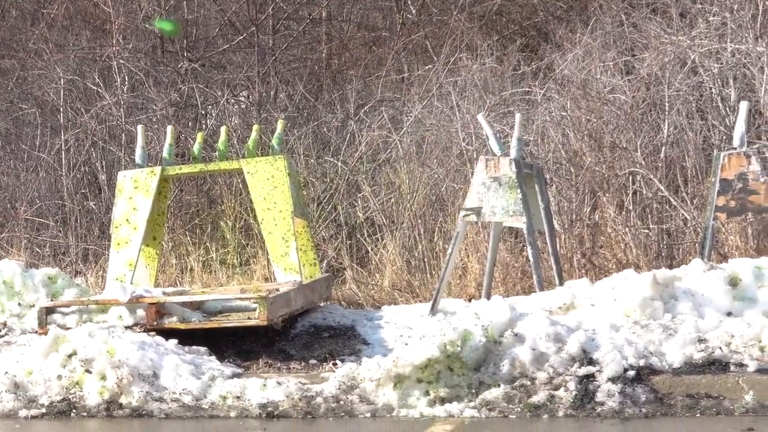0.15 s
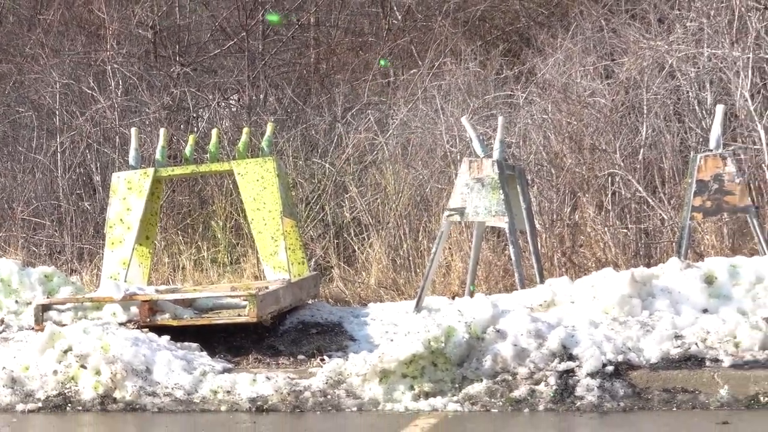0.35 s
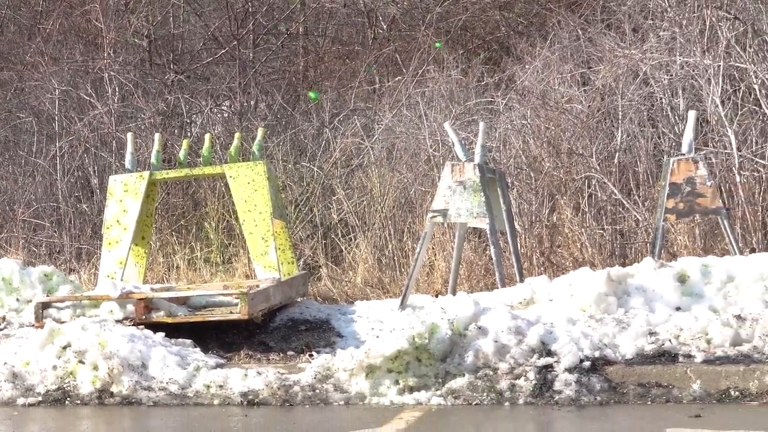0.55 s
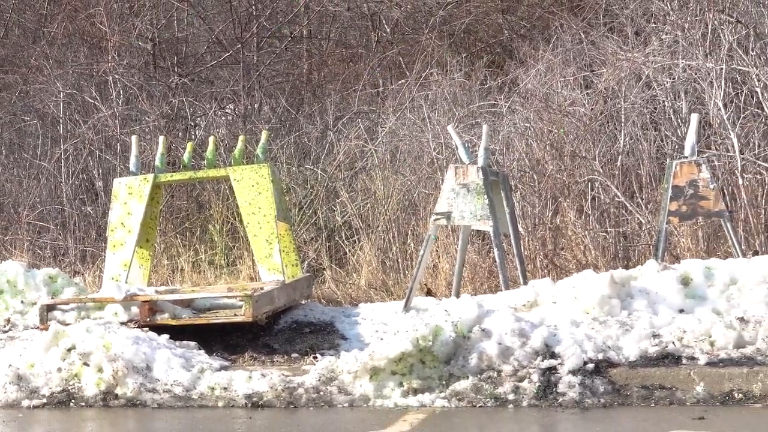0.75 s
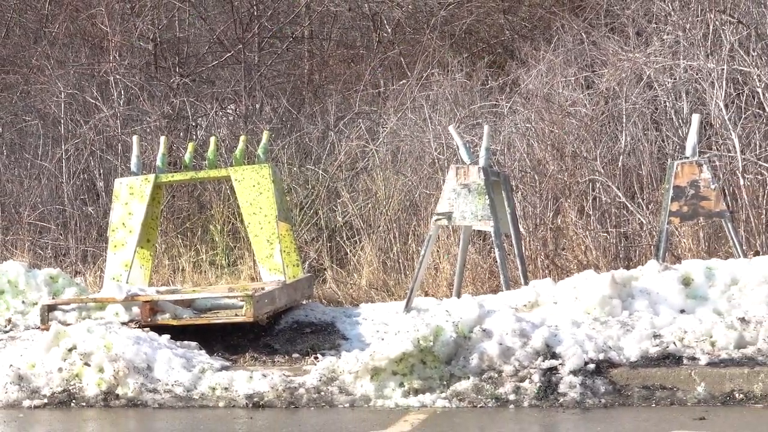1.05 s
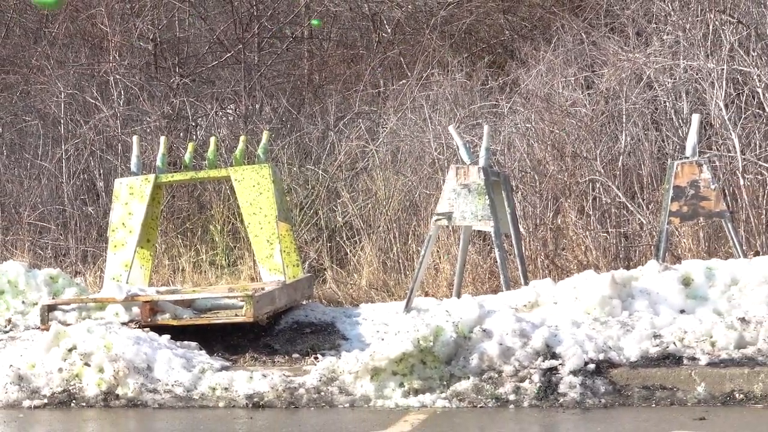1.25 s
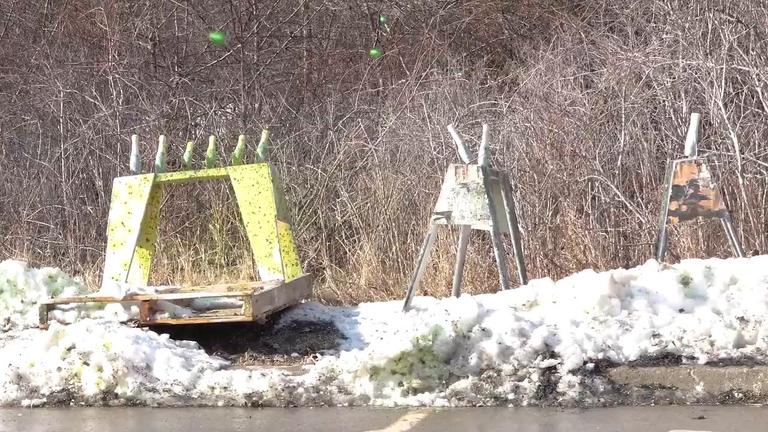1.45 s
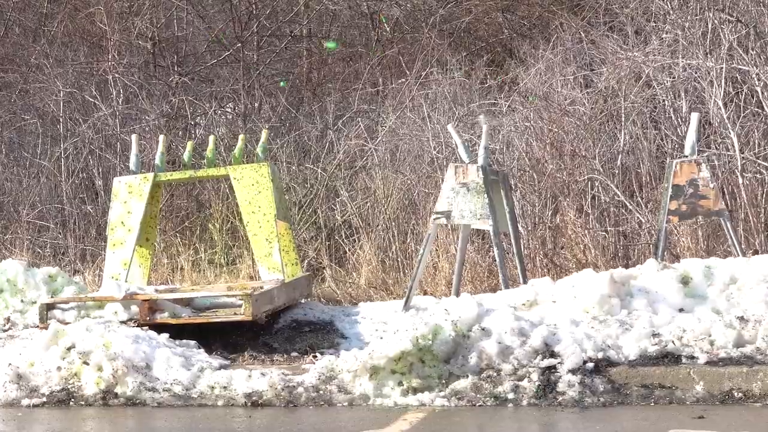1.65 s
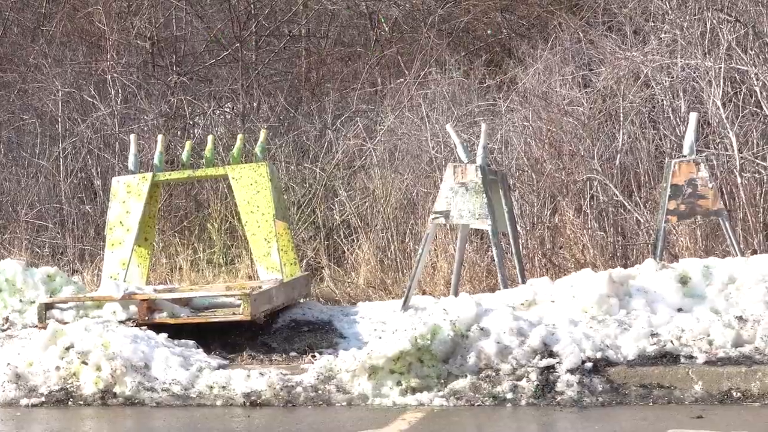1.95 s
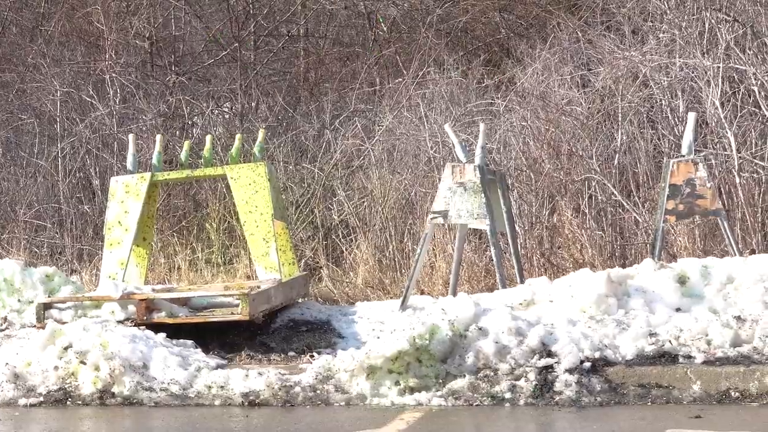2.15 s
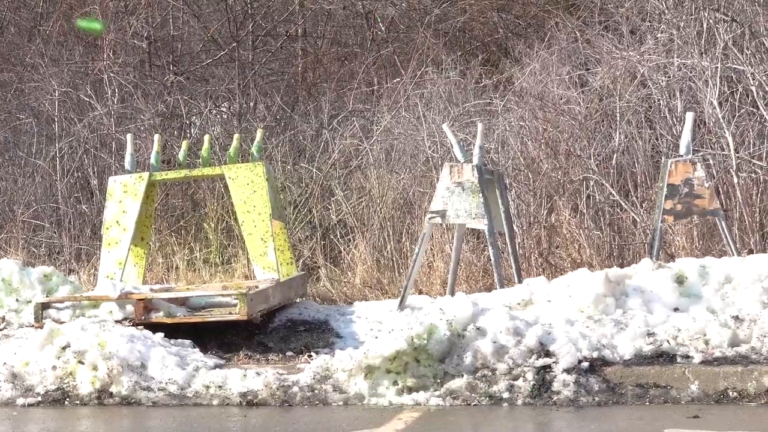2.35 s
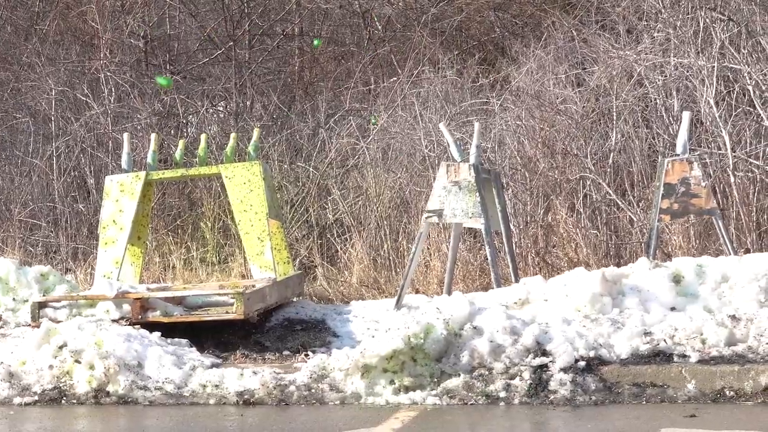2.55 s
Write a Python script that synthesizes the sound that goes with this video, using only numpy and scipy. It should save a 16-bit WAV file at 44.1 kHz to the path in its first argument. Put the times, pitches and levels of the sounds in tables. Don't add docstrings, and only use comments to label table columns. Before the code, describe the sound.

A paintball marker fires close to the microphone in an open snowy field. Low outdoor hum and a faint trigger click lead to six rapid shots from 0.16 s, eight from 1.19 s and four from 2.38 s, about twelve per second. Each is a tick, bolt knock, hollow gas pop and short barrel ring. Dull echoes follow; distant twigs snap around 0.86-1.07 and 1.9-2.33 s.

```python
import sys
import numpy as np
from scipy import signal
from scipy.fft import rfft, irfft
from scipy.io import wavfile
from scipy.ndimage import uniform_filter1d

SR = 44100
rng = np.random.default_rng(int(sys.argv[2]) if len(sys.argv) > 2 else 0)


def elevation(decibels):
    levels = np.asarray(decibels, float)
    return 10 ** (levels / 20)


def unload_wav(signal):
    wavfile.write(
        sys.argv[1],
        SR,
        np.round(np.clip(np.atleast_2d(signal).T, -1, 1) * 32767).astype(np.int16),
    )


N = 119070


def rms_one(x):
    return x / np.sqrt(np.mean(x ** 2) + 1e-20)


def filtered(x, order, hz, kind="low"):
    return signal.sosfilt(signal.butter(order, hz, kind, fs=SR, output="sos"), x)


def at_hz(points, hz):
    point_hz, value = np.transpose(points)
    return np.interp(np.log(np.maximum(hz, 1)), np.log(point_hz), value)


def coloured(spectrum):
    hz = np.arange(N // 2 + 1) * SR / N
    return rms_one(irfft(rfft(rng.standard_normal(N)) * elevation(at_hz(spectrum, hz)), N))


def lumps(count, size):
    return rms_one(uniform_filter1d(rng.standard_normal(count), size=size))


def clicks(s, gains):
    out = np.full(N, 1e-18)
    i = (np.asarray(s) * SR).astype(int)
    inside = i < N
    np.add.at(out, i[inside], (gains + 0 * i)[inside])
    return out


def ring(x, hz, t60):
    r = elevation(-60 / (t60 * SR))
    w = 2 * np.pi * hz / SR
    return signal.lfilter([0, np.sin(w)], [1, -2 * r * np.cos(w), r * r], x)


def soft_ring(x, hz, t60):
    return ring(ring(x, hz, t60), hz, t60) * 2 * np.e * np.log(1000) / (t60 * SR)


def fade(x, db_per_ms):
    return signal.lfilter([1], [1, -elevation(-db_per_ms * 1000 / SR)], x)


def vary(shots, db=1.2):
    return db * rng.standard_normal(len(shots))


# f/Hz, level/dB per Hz
HUM_COLOUR = [(15, -26), (25, -14), (91, 4.5), (599, -0.5), (868, -1), (2140, -25), (3440, -30),
              (7220, -38.5), (14000, -86)]


def outdoor_hum():
    return elevation(-52.5) * coloured(HUM_COLOUR)


def snap_bursts(events):
    length, width = 4000, .37
    out = np.zeros(N + length)
    ms = np.arange(length) * 1000 / SR
    shape = elevation(-9.5 * ms) + elevation(-8 - .5 * ms)
    for s, db, hz in events:
        edges = [hz / (1 + width), min(hz * (1 + width), 13000)]
        noise = rng.standard_normal(length) * shape * elevation(db - 3)
        start = int(s * SR)
        out[start:start + length] += filtered(noise, 1, edges, "band")
    return filtered(out[:N], 4, 9500)


# t/s, level/dB, f/Hz
TRIGGER_TOUCHES = [
    (.149, -58.5, 2500),
    (1.174, -62, 2800),
    (2.3645, -67, 2800),
]


def trigger_touch():
    return snap_bursts(TRIGGER_TOUCHES)


# t/s of the first tick, number of shots
SHOT_STRINGS = [
    (.1616, 6),
    (1.1866, 8),
    (2.3763, 4),
]


def shot_times():
    cycle_s, first_wait_s = .08385, .005
    ticks = [s + k * cycle_s + first_wait_s * (k > 0) for s, count in SHOT_STRINGS for k in range(count)]
    rested = np.diff(ticks, prepend=0) > 2 * cycle_s
    return np.array(ticks), rested


# f/Hz, level/dB, t60/s
SOLENOID_TONES = [(2850, -30, .007), (4270, -25, .007), (6385, -23, .009), (7620, -40, .01),
                  (12000, -52, .006)]


def solenoid(ticks):
    tick_ms, ring_ms = -2.5, -.95
    out = soft_ring(clicks(ticks + tick_ms / 1000, elevation(-13)), 900, .005)
    for hz, db, t60 in SOLENOID_TONES:
        out += ring(clicks(ticks + ring_ms / 1000, elevation(db + vary(ticks, .5))), hz, t60)
    return out


# f/Hz, level/dB per Hz
GAS_COLOUR = [(290, -2), (500, -0.5), (718, -2), (1600, -14), (2610, -17.5), (5090, -21), (7100, -33),
              (8450, -30.5), (16000, -63)]


def gas_jet(ticks, blast):
    start_ms, peak_ms, fall_db_per_ms = 9.0, 17.5, 6
    ms = np.arange(SR // 10) * 1000 / SR
    after = np.maximum(ms - peak_ms, 0)
    rise_db = np.interp(ms, [start_ms - 2, start_ms, peak_ms], [-60, -18, -8.5])
    shape = elevation(rise_db - fall_db_per_ms * after)
    shape += (after > 0) * elevation(-28.5 - .74 * after)
    flow = signal.fftconvolve(clicks(blast, elevation(vary(blast))), shape)[:N]
    flow += fade(clicks(ticks, elevation(-23)), 1.5)
    rough = elevation(3 * lumps(N, 40))
    return flow * rough * filtered(coloured(GAS_COLOUR), 4, 732, "high")


KNOCK_TIMES = [9.0, 12.4, 16.6, 17.0, 38.5]
# f/Hz, level/dB, t60/s
KNOCK_TONES = [
    (1150, -10, 0.0034),
    (631, -15, 0.015),
    (961, -20, 0.014),
    (2500, -12, 0.0019),
    (1000, -34.5, 0.0078),
]


def bolt_knocks(blast):
    out = np.zeros(N)
    for ms, (hz, db, t60) in zip(KNOCK_TIMES, KNOCK_TONES):
        when = blast + (ms + .15 * rng.standard_normal(len(blast))) / 1000
        out += soft_ring(clicks(when, elevation(db + vary(blast))), hz, t60)
    return out


CLOSED_STARTS = [10.8, 11.1, 10.8]
# f/Hz, first level/dB, last level/dB
CLOSED_TONES = [(253.2, -20, -10.5), (468, -10.5, -16.5), (108, -27.5, -20)]
OPEN_LEADS = [.4, -.2]
# f/Hz, height, t60/s
OPEN_TONES = [(186, -0.12, 0.087), (409.2, 0.38, 0.049)]


def barrel(blast, rested):
    exit_ms, fade_ms, length = 20.4, 1.0, 2000
    pitches = 1 + .02 * rng.standard_normal(len(blast))
    gains = elevation(vary(blast) + 2 * rested)
    out = np.zeros(N + length)
    ms = np.arange(length) * 1000 / SR
    for (hz, first_db, last_db), start_ms in zip(CLOSED_TONES, CLOSED_STARTS):
        gate = (ms > start_ms) * np.clip((exit_ms - ms) / fade_ms + .5, 0, 1)
        level = gate * elevation(np.interp(ms, [start_ms, exit_ms], [first_db, last_db]))
        for s, pitch, gain in zip(blast, pitches, gains):
            tone = np.sin(2 * np.pi * hz * pitch * (ms - start_ms) / 1000)
            i = int(s * SR)
            out[i:i + length] -= gain * level * tone
    out = out[:N]
    for (hz, height, t60), lead_ms in zip(OPEN_TONES, OPEN_LEADS):
        out += ring(clicks(blast + (exit_ms - lead_ms) / 1000, height * gains), hz, t60)
    return out


def bolt_return(ticks):
    return_ms, hz = 39.0, 3135
    envelope = fade(clicks(ticks + return_ms / 1000, elevation(-39.5 + vary(ticks, 2))), 1.6)
    return envelope * rms_one(filtered(rng.standard_normal(N), 2, [hz / 1.6, hz * 1.4], "band"))


def marker():
    ticks, rested = shot_times()
    jitter_ms = .25
    blast = ticks + jitter_ms * rng.standard_normal(len(ticks)) / 1000
    out = solenoid(ticks) + gas_jet(ticks, blast) + bolt_knocks(blast)
    out += barrel(blast, rested) + bolt_return(ticks)
    return filtered(out, 2, 83, "high")


ECHO_DELAYS = [47, 78, 104, 131, 152]
# level/dB, spread/ms, low-pass f/Hz
ECHO_SHAPES = [(-18, 4, 5400), (-28, 9, 15000), (-37.5, 11, 5100), (-37, 3, 1500), (-40.5, 2.7, 1600)]
# f/Hz, t60/s
TAIL_LENGTHS = [(100, .35), (400, .42), (1600, .4), (4000, .33), (10000, .2)]
# f/Hz, level/dB
TAIL_LEVELS = [(100, -38.5), (400, -33), (900, -30.5), (1500, -24.5), (2400, -33), (4500, -31.5),
               (10000, -34)]


def field(x):
    t = np.arange(SR) / SR
    echoes, tail = np.zeros(SR), np.zeros(SR)
    for delay_ms, (db, spread_ms, cut_hz) in zip(ECHO_DELAYS, ECHO_SHAPES):
        late_ms = t * 1000 - delay_ms
        smear = rng.standard_normal(SR) * (late_ms > 0) * np.exp(-np.maximum(late_ms, 0) / spread_ms)
        echoes += elevation(db) * filtered(smear / np.linalg.norm(smear), 1, cut_hz)
    echoes = filtered(echoes, 2, 650, "high")
    clear_ms = 33.8
    echoes += filtered(clicks([clear_ms / 1000], elevation([-19]))[:SR], 1, 440)
    grains = elevation(3 * lumps(SR, 220))
    edge = 2 ** .25
    for hz in 70 * 2. ** np.arange(0, 7.6, .5):
        band = filtered(grains * rng.standard_normal(SR), 2, [hz / edge, hz * edge], "band")
        level_db = at_hz(TAIL_LEVELS, hz) - 33 - 60 * t / at_hz(TAIL_LENGTHS, hz)
        tail += band * elevation(level_db) * np.minimum(t / .06, 1)
    return signal.fftconvolve(x, echoes + tail)[:N]


# t/s, level/dB, f/Hz
TWIG_HITS = [(0.8644, -45.5, 3400), (0.8794, -46, 2560), (0.9434, -61, 3660), (0.9544, -52, 4390),
             (0.9742, -51, 3350), (0.9964, -55, 4720), (1.0357, -42, 3000), (1.0454, -61, 7720),
             (1.056, -43, 3820), (1.0744, -46.5, 3830), (1.921, -42.5, 2720), (1.979, -47, 2700),
             (2.0193, -65, 2500), (2.02, -47, 3620), (2.0405, -46, 4000), (2.0514, -49, 4310),
             (2.1246, -65.5, 2550), (2.153, -60, 3590), (2.2034, -45.5, 2780), (2.2129, -49, 3160),
             (2.2544, -54, 5420), (2.2623, -52, 2770), (2.2702, -46.5, 5380), (2.3094, -58, 3060),
             (2.33, -56, 2910)]


def twig_snaps():
    return snap_bursts(TWIG_HITS)


def scene():
    shots = marker()
    return (outdoor_hum() + trigger_touch() + shots + field(shots) + twig_snaps())[None]


def roll_off(x):
    return signal.sosfilt(signal.butter(12, 16650, fs=SR, output="sos"), x)


def record(dry):
    ceiling = .76
    held = dry / (1 + (np.abs(dry) / ceiling) ** 4) ** .25
    mix = signal.sosfilt(signal.cheby2(12, 50, 16500, fs=SR, output="sos"), held)
    return roll_off(mix)


dry = scene()
out = record(dry)
unload_wav(out)
```